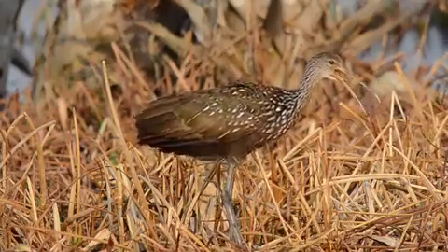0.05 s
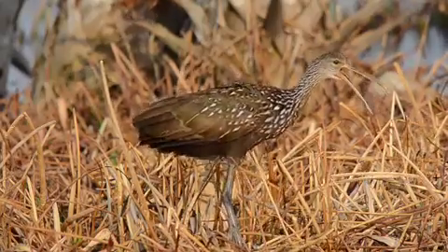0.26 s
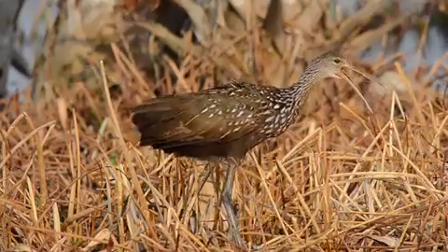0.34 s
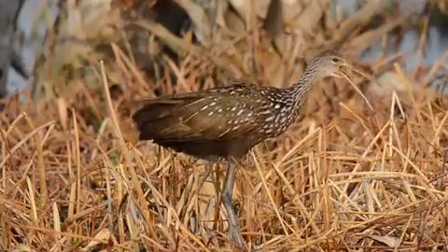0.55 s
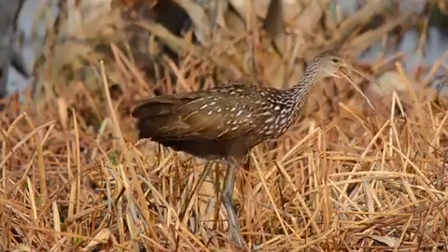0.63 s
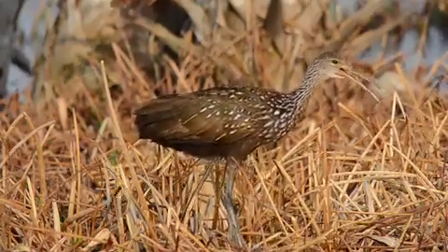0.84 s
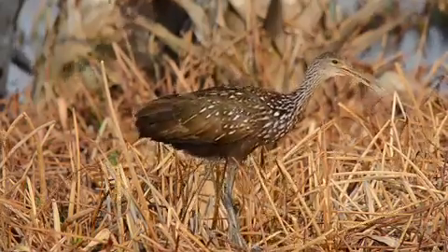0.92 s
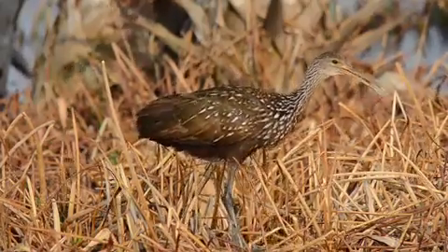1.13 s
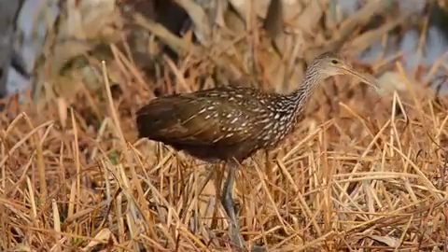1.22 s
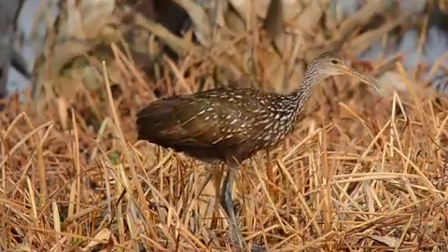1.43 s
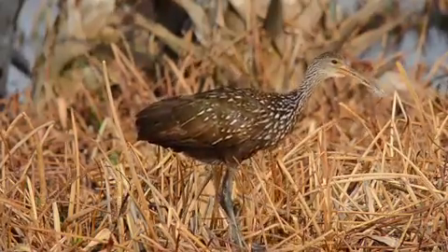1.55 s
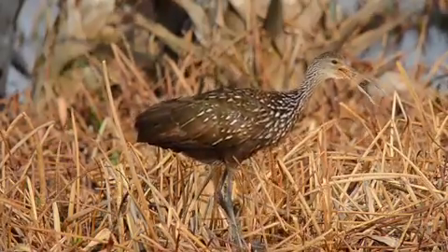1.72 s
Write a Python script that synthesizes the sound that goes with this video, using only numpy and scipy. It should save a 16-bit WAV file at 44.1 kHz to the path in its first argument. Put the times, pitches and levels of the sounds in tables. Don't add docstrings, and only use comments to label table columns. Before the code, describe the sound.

A wading bird gives one loud, harsh wail that rises, cracks twice and falls over a marsh

```python
import sys
import numpy as np
from scipy import signal
from scipy.fft import rfft, irfft
from scipy.io import wavfile
from scipy.ndimage import uniform_filter1d

SR = 44100
rng = np.random.default_rng(int(sys.argv[2]) if len(sys.argv) > 2 else 0)


def pcm_store(signal):
    levels = np.round(np.clip(np.atleast_2d(signal), -1, 1) * 32767)
    wavfile.write(sys.argv[1], SR, levels.astype(np.int16).T)


def voltage_ratio(decibels):
    exponent = np.asarray(decibels, float) / 20
    return 10 ** exponent


N = 79380


def band(x, hz, width):
    return signal.lfilter(*signal.iirpeak(hz, hz / width, fs=SR), x)


def bank(x, table):
    out = 0
    for k, (hz, width, db) in enumerate(table):
        out = out + (-1) ** k * voltage_ratio(db) * band(x, hz, width)
    return out


def soften(x, hz):
    return signal.sosfilt(signal.butter(2, min(hz, 20000), fs=SR, output="sos"), x)


def level(x, db):
    return x * voltage_ratio(db) / np.sqrt(np.mean(x ** 2))


def walk(rate):
    k = int(SR / rate)
    steps = np.repeat(rng.standard_normal(N // k + 1), k)
    return 1.36 * uniform_filter1d(uniform_filter1d(steps, k), k)[:N]


def follow(t, table, column):
    rows = np.array(table)
    return np.interp(t, rows[:, 0], rows[:, column])


def stack(hz, tilt_db, patchy_db, count):
    phase = 2 * np.pi * np.cumsum(hz) / SR
    out = 0
    for k in range(1, count + 1):
        patchy = patchy_db * np.clip(k - 2.5, .5, 5) * walk(25.2)
        audible = k * hz < .45 * SR
        out = out + voltage_ratio(tilt_db * np.log2(k) + patchy) * np.sin(k * phase) * audible
    return out, phase


def hush(table, db, flicker_db):
    hz, gain_db = np.array(table).T
    f = np.fft.rfftfreq(N, 1 / SR) + 1
    colour = voltage_ratio(np.interp(np.log(f), np.log(hz), gain_db, right=-90))
    spectrum = rfft(rng.standard_normal(N)) * colour
    place = 2 * np.log2(f)
    out = 0
    for k in range(8, 30):
        flicker = voltage_ratio(flicker_db * (walk(4) + walk(13.84)))
        out = out + flicker * irfft(spectrum * np.clip(1 - abs(place - k), 0, 1), N)
    return level(out, db)


# (pitch [Hz], level [dB per Hz])
AIR_COLOUR = [(15, -59), (25, -11.5), (92, -4), (130, -5), (228, -3), (427, -2.5), (491, -4.5),
              (1250, -4.5), (6500, -26), (8450, -42), (14300, -120)]


def air():
    return hush(AIR_COLOUR, -53.5, 0.9)


# (pitch [Hz], level [dB per Hz])
INSECT_COLOUR = [(5800, -46), (6800, -5.5), (8000, 5.5), (9500, -6.5), (11000, -12.5), (13000, -24),
                 (16000, -32)]


def far_insects():
    return hush(INSECT_COLOUR, -64, 0.33)


# (time [s], level [dB], pitch [Hz])
WIND_BUMPS = [
    (1.142, -51, 50),
    (1.201, -49, 60.4),
    (1.677, -46, 70.4),
    (1.694, -43.5, 60.5),
]


def wind(t):
    out = 0
    for s, db, hz in WIND_BUMPS:
        puff = np.exp(-((t - s) * hz * 3.9) ** 2)
        out = out - voltage_ratio(db) * puff * np.cos(2 * np.pi * hz * (t - s))
    return out


def reed_tick(t):
    u = np.maximum(t - 0.032, 0)
    return voltage_ratio(-48.5) * np.exp(-u / 0.0025) * np.sin(2 * np.pi * 5210 * u)


# (first chirp [s], chirp rate [per s])
CRICKET_TRILLS = [
    (.0174, 51.82),
    (.0098, 54.3),
]
# (level [dB], top pitch [Hz])
CRICKET_TONES = [
    (-46, 8407),
    (-54, 8300),
]


def crickets(t):
    chirp_s, peak, arch_hz = .012, .42, 3800
    out = 0
    for (s, rate), (db, top_hz) in zip(CRICKET_TRILLS, CRICKET_TONES):
        strokes = (t - s) * rate + 0.008 * walk(3) + 5
        u = strokes % 1 / rate / chirp_s
        luck = rng.standard_normal((120, 2))[strokes.astype(int)]
        shape = np.clip(u / 0.077, 0, 1) * np.clip((1 - u) / 0.27, 0, 1)
        hz = top_hz * (1 + 0.00301 * luck[:, 1]) - arch_hz * (np.minimum(u, 1) - peak) ** 2
        loudness = voltage_ratio(db + 1.2 * luck[:, 0] + 0.51 * walk(470))
        out = out + loudness * shape * np.sin(2 * np.pi * np.cumsum(hz) / SR)
    echoes = 0
    for delay_s, db in ((.0034, -25), (.0071, -34)):
        echoes = echoes + voltage_ratio(db + 1.1 * walk(4.8)) * np.roll(out, int(delay_s * SR))
    return out + echoes


# (time [s], level [dB], stretch [times])
CROAK_TIMES = [
    (0.181, -41, 1.05),
    (0.701, -38.5, 1),
]
# (time into it [s], pitch [Hz], level [dB], hoarseness [0-1])
CROAK_SHAPE = [
    (0, 606, -15, 1),
    (0.02, 539, -5, 0.69),
    (.05, 477, -3.5, 0.5),
    (0.084, 420, -7, 0.13),
    (0.132, 468, -11, 0.17),
    (.17, 546, -14.5, 0),
    (.2, 616, -8.5, 0.14),
    (0.219, 690, -18, 0.1),
]
# (pitch [Hz], width [Hz], level [dB])
CROAK_HOLLOWS = [(451, 105, -3), (963, 214, 8.5), (1755, 560, 10), (2250, 240, -4)]


def croaks(t):
    out = 0
    for s, db, stretch in CROAK_TIMES:
        hz, env_db, hoarse = (follow((t - s) / stretch, CROAK_SHAPE, k) for k in (1, 2, 3))
        tone, phase = stack(hz * (1 + 0.0075 * walk(120)), -4.5, 1.0, count=5)
        rasp = 3 * rng.standard_normal(N) * (1 + np.cos(phase))
        hoarse = np.clip(hoarse, 0, 1)
        live = (t > s) & (t < s + stretch * CROAK_SHAPE[-1][0])
        out = out + voltage_ratio(db + env_db + 1.7 * walk(40)) * live * ((1 - hoarse) * tone + hoarse * rasp)
    return soften(soften(bank(out, CROAK_HOLLOWS), 3800), 3800)


def reeds(x):
    t60_s, gap_s = 0.33, 0.009
    u = np.arange(SR // 2) / SR
    tail = rng.standard_normal(len(u))
    uneven_db = 3.5 * rng.standard_normal(len(u))
    tail = tail * voltage_ratio(-60 * u / t60_s + uneven_db) * (u > gap_s)
    tail = band(tail, 1800, 2500)
    return signal.fftconvolve(x, voltage_ratio(-21) * tail / np.sqrt(np.sum(tail ** 2)))[:N]


# (pitch [Hz], width [Hz], level [dB])
OPEN_PIPE = [(1330, 173, 3), (1562, 305, -2.5), (2000, 130, -8.5), (2899, 167, 4.5), (3440, 412, 1),
             (4257, 500, -1.5), (5490, 212, -4.5), (6520, 95, -25.5), (8160, 450, -13), (9840, 1000, -28.5),
             (11500, 1700, -30), (13300, 4700, -34.5)]


def open_windpipe(x):
    return bank(x, OPEN_PIPE)


# (pitch [Hz], width [Hz], level [dB])
SHUT_PIPE = [(1337, 155, 2), (2687, 260, -6), (3380, 250, -9), (4500, 260, -1.5), (5080, 340, -5),
             (6190, 320, -9.5), (8310, 1030, -14), (9350, 2200, -20.5), (12000, 1300, -25)]


def shut_windpipe(x):
    return bank(x, SHUT_PIPE)


# (time [s], level [dB], throat pitch [Hz], beak level [dB], beak pitch [Hz])
THROAT_CLAPS = [(0.1814, -27.5, 1363, -7, 4250), (0.187, -29.5, 1420, -3, 3920),
                (0.2088, -27, 1310, -2, 3600), (0.2106, -24, 1330, -5.5, 3270),
                (0.2149, -20.5, 1425, -5.5, 2780), (0.2184, -26, 1430, 2.5, 2780),
                (0.222, -38.5, 1430, 10, 3970), (0.9343, -29, 1307, -0.5, 3440),
                (0.9405, -21, 1380, -4, 4000), (0.9454, -27.5, 1267, -4.5, 3600),
                (0.9517, -28, 1320, -2.5, 3440), (0.989, -22, 1282, -11, 3200),
                (0.996, -27, 1335, -3, 4147), (1.001, -35, 1140, -1, 3140), (1.006, -38, 1235, 0.5, 3200),
                (1.0465, -27, 1195, -10, 4500), (1.0524, -31, 1060, -9, 3800),
                (1.0579, -50, 1200, -4, 4500)]


def rattles(t):
    ring, spray, noise = np.zeros(N), np.zeros(N), rng.standard_normal(N)
    for s, db, throat_hz, beak_db, beak_hz in THROAT_CLAPS:
        u = np.maximum(t - s, 0)
        throat = (1 - np.exp(-u / 0.00093)) * np.exp(-u / 0.0029)
        puff = (1 - np.exp(-u / 0.00013)) * np.exp(-u / 0.0023)
        beak = (1 - np.exp(-u / 0.00046)) * np.exp(-u / 0.0013)
        ring += voltage_ratio(db) * throat * np.sin(2 * np.pi * throat_hz * u)
        ring += voltage_ratio(db + beak_db - 2) * beak * np.sin(2 * np.pi * beak_hz * u)
        spray += voltage_ratio(db + beak_db) * puff * noise
    piped = soften(2.35 * open_windpipe(spray) + 2.25 * shut_windpipe(spray), 7200)
    leak = soften(soften(band(spray, 7460, 4000), 10500), 10500)
    return 2 * ring + piped + voltage_ratio(-22) * leak


# (time [s], pitch [Hz], effort [dB], overtone tilt [dB per octave], beak closed [0-1])
RISING = [(.212, 1224, -53, -22, .5), (.222, 1286, -25, -4, 0.14), (.24, 1346, -20.5, -6.5, 0.3),
          (.264, 1390, -19, -2, 0.95), (.270, 1522, -17, -5.5, 0.1), (.296, 1601, -17, -4, 0.24),
          (.31, 1700, -20, 1.5, 0.01), (.328, 1752, -14.5, -6, 0.17), (.3405, 1749, -15, -2.5, 0.08)]
HIGHEST = [(.3945, 1848, -9.5, -6, 0.13), (.399, 1880, -13, 0, 0.14), (.41, 1857, -10.5, -3.5, 0.075),
           (.419, 1812, -14, -5.5, 0.12), (.422, 1761, -16.5, -6.5, 0.067), (.4258, 1701, -13, 1, 0.23)]
FALLING = [(.4608, 1832, -10, -5, 0.068), (.47, 1792, -18.5, -3.5, 0.072), (.482, 1756, -14, -4.5, 0.085),
           (.512, 1653, -24, 3.5, 0.072), (.522, 1596, -20, 2, 0.088), (.532, 1540, -19.5, -4.5, 0.13),
           (.577, 1482, -20.5, -1.5, 0.079), (.618, 1424, -19, -5.5, 0.25), (.631, 1386, -18, -6.5, 0.46),
           (.638, 1330, -20.5, -1.5, 0.97)]
FADING = [(0.659, 1306, -21, -3.5, 1), (0.711, 1268, -24, -3, 0.38), (0.751, 1240, -26, -2, 0.52),
          (.8, 1214, -29, -1, 0.83), (0.849, 1175, -27, -4, 0.84), (0.888, 1144, -32, -1, 1),
          (.918, 1103, -31, -1.5, 0.83), (0.933, 1044, -23, -5, 0.79)]


def wail_path(t):
    scoop_s, scoop = .002, .84
    drop_s, hold_s, rebound_s, fade_s = .0027, 0.00271, 0.00435, 0.003
    break_hz, break_db = 1474, 4
    rows, rasp = [], np.zeros(N)
    for phrase, breaks in ((RISING, True), (HIGHEST, True), (FALLING + FADING, False)):
        start, hz, db = phrase[0][:3]
        colour = phrase[0][3:]
        rows.append((start - scoop_s - .0005, scoop * hz, -70) + colour)
        rows.append((start - scoop_s, scoop * hz, db - 14) + colour)
        rows += list(phrase)
        if breaks:
            end, beak = phrase[-1][0], phrase[-1][4]
            held = end + drop_s + hold_s
            rows.append((end + drop_s, break_hz, -23 + break_db, -7, beak))
            rows.append((held, break_hz, -19 + break_db, -5, beak))
            rows.append((held + rebound_s, 1780, -22, -2, beak))
            rasp += 3 * np.clip((t - end) / (drop_s + hold_s + rebound_s), 0, 1) * (t < end + .03)
        rasp += 0.1 * np.exp(-abs(t - start) / 0.0067)
        last = rows[-1]
        rows.append((last[0] + fade_s, last[1], -45) + last[3:])
        rows.append((last[0] + 2 * fade_s, last[1], -70) + last[3:])
    rasp += 0.67 * np.exp(-abs(t - FADING[-1][0]) / 0.0086)
    rows = np.array(rows)
    rows[:, 0] = np.maximum.accumulate(rows[:, 0])
    return rows, rasp


# (time [s], air leak [dB], stretched-neck ringing [dB])
THROAT_STRAIN = [
    (.21, 1.5, -38),
    (.34, 2, -40),
    (.4, -1.5, -26),
    (.46, 2.5, -21.5),
    (.49, -6, -19),
    (.53, -18.5, -28),
    (.7, -13.5, -38),
    (.93, -10.5, -46),
]


def wail(t):
    rows, rasp = wail_path(t)
    hz, db, tilt, shut = (follow(t, rows, k) for k in (1, 2, 3, 4))
    leak, neck = (voltage_ratio(follow(t, THROAT_STRAIN, k)) for k in (1, 2))
    live = (t > rows[0, 0]) * (t < rows[-1, 0])
    patchy_db = 1.4 * np.clip(1.3 - shut, .6, 1)
    tone, phase = stack(hz * (1 + 0.00174 * leak * walk(300)), tilt, patchy_db, count=12)
    pulse = 1 + np.cos(phase)
    breath = (voltage_ratio(-44.5) * leak + voltage_ratio(-24) * rasp) * 8 * np.diff(rng.standard_normal(N + 1)) * pulse
    voice = np.sqrt(2) * voltage_ratio(db - 0.39 * walk(90)) * live * (tone + breath)
    shut = np.clip(shut, 0, 1)

    hiss = band(band(rng.standard_normal(N) * pulse, 7900, 6000), 7900, 6000)
    steady = voltage_ratio(-33.5 + 2.1 * walk(140)) * leak * (1 - .7 * shut)
    puff = voltage_ratio(db) * live * (steady + voltage_ratio(-19.5) * rasp)
    keep = np.exp(-1 / (.01 * SR))
    hiss = hiss * (puff + 0.58 * signal.lfilter([1 - keep], [1, -keep], puff))
    hiss = soften(soften(hiss, 10000), 10000)

    neck_ring = neck * band(band(voice, 7125, 390), 7125, 390)
    opened = soften(open_windpipe(voice - 0.94 * band(voice, 1762, 197)), 12000)
    closed = shut_windpipe(voice - 1.3 * band(voice, 3970, 250))
    piped = soften((1 - shut) * opened + soften(shut, 200) * closed, 7200)
    return hiss + neck_ring + piped


def scene():
    t = np.arange(N) / SR
    bird = wail(t) + rattles(t)
    call = bird + reeds(bird)
    marsh = crickets(t) + croaks(t) + wind(t) + reed_tick(t) + air() + far_insects()
    return (call + marsh)[None]


def low_pass(x):
    return signal.sosfilt(signal.butter(12, 15730, fs=SR, output="sos"), x)


def record(dry):
    mix = signal.sosfilt(signal.butter(2, 35, "high", fs=SR, output="sos"), dry)
    mix = mix - 0.96 * band(mix, 5612, 550)
    return low_pass(mix)


dry = scene()
out = record(dry)
pcm_store(out)
```